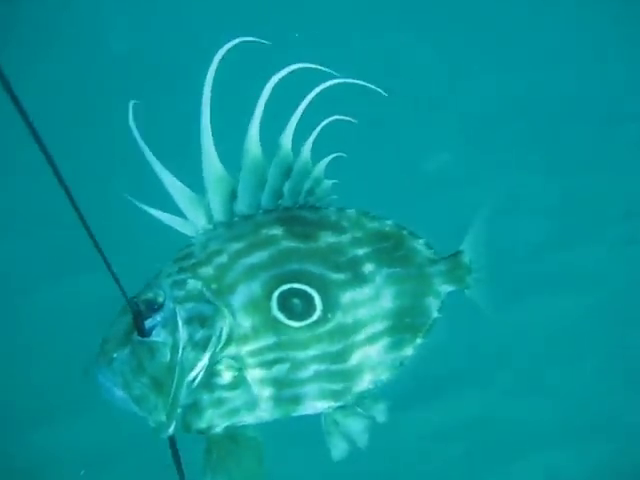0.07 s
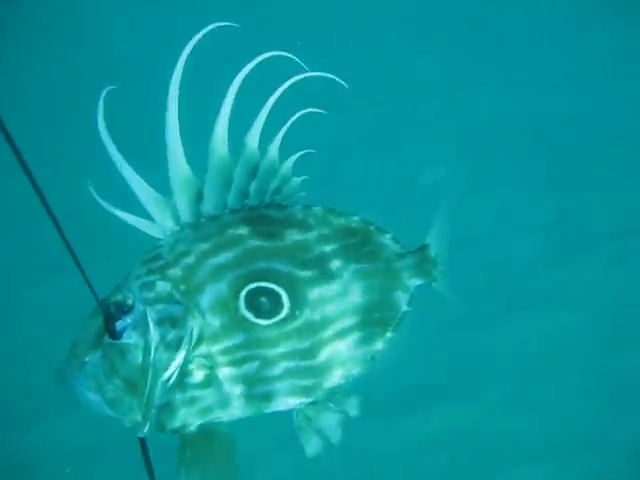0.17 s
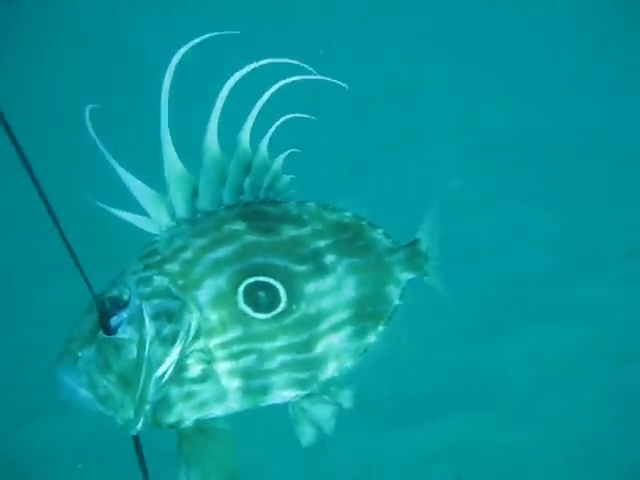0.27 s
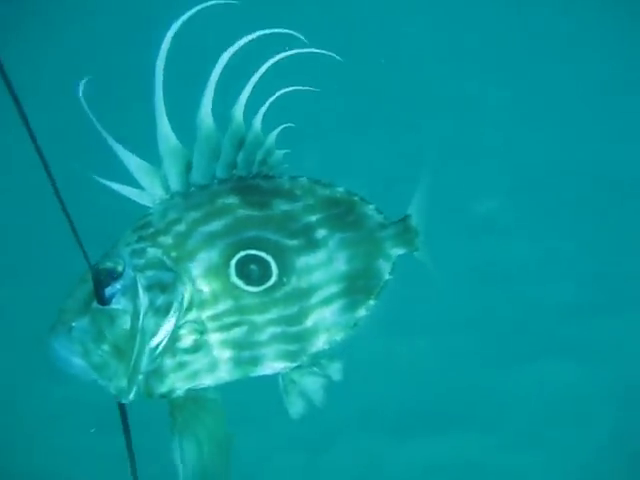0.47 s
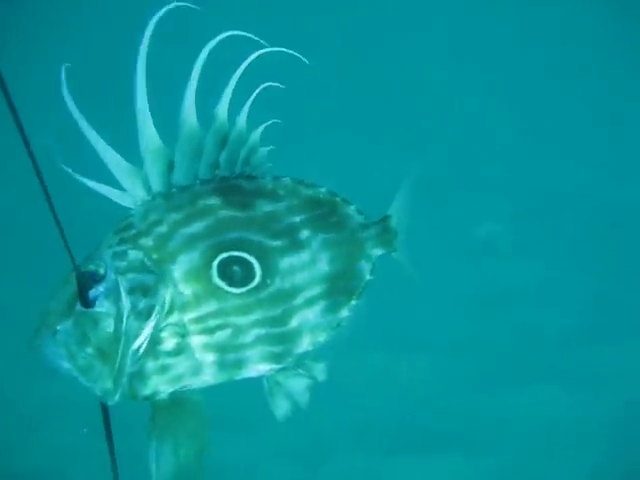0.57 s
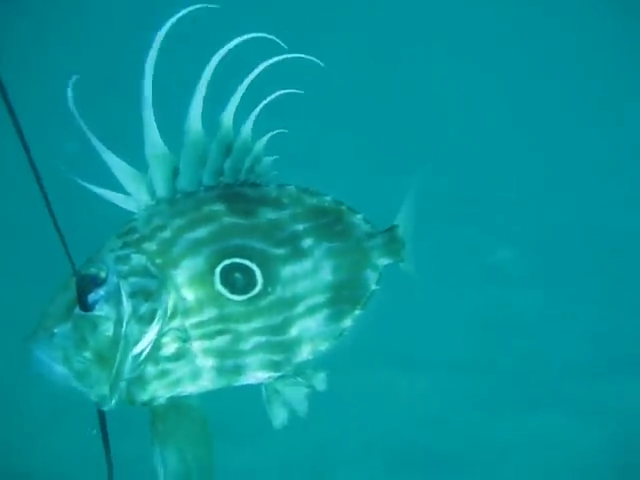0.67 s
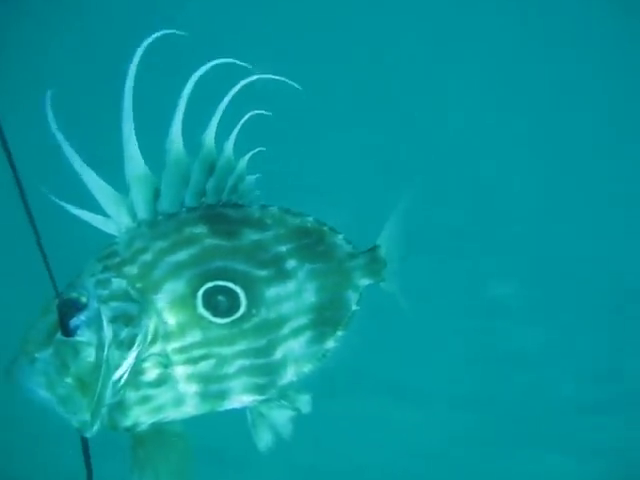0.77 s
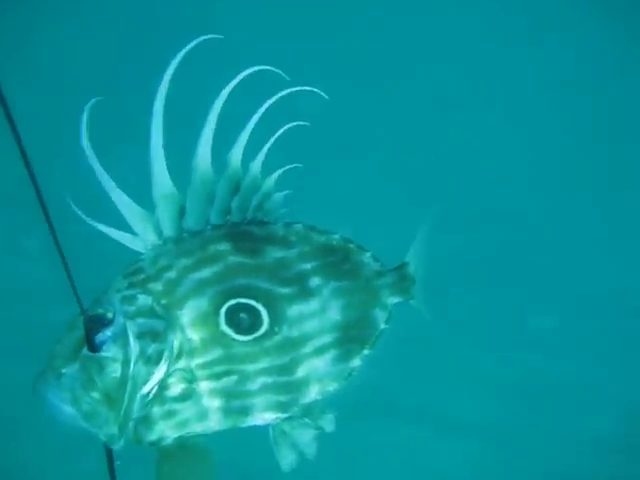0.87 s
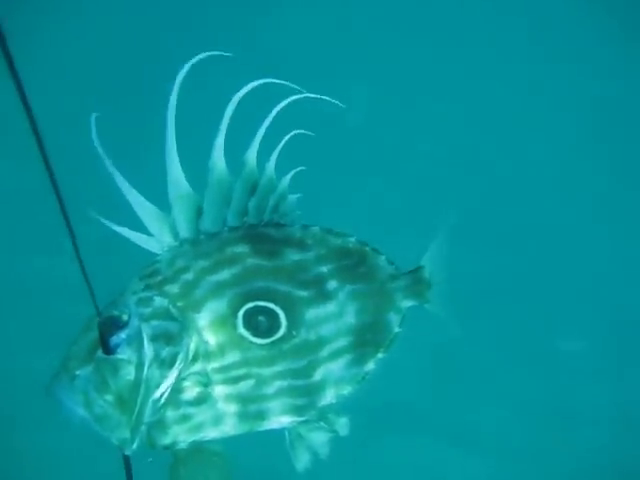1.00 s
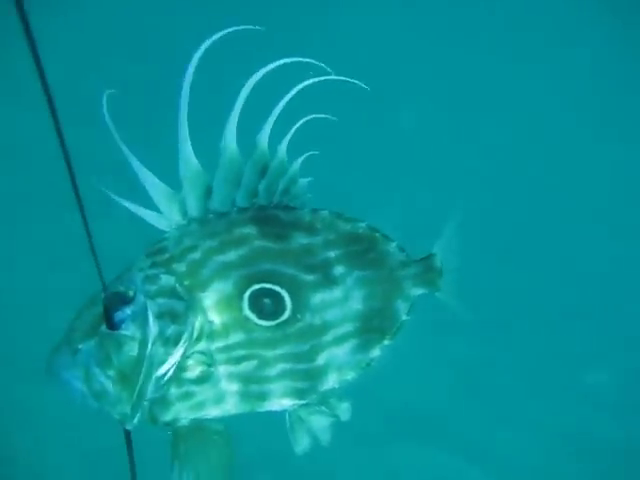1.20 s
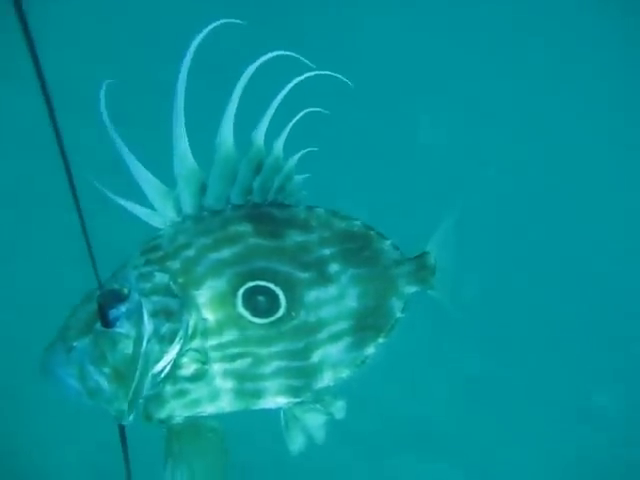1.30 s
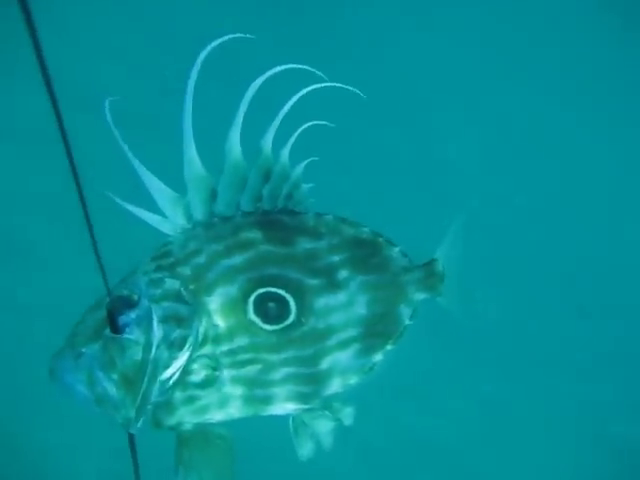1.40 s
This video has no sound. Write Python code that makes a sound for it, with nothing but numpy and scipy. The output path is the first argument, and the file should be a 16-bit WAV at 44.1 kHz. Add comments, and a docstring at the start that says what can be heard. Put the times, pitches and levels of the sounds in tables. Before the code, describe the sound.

A fish grunts once, close to an underwater microphone, from about 0.2 to 0.4 seconds: a low, rapid drumming that slows slightly. Quieter sea hiss and small, slightly ringing snaps, probably shrimps, continue near and far for the whole second and a half. Tiny bright pings come at 0.2 and 1.1 seconds. Soft knocks are scattered throughout, with faint low sloshing around 0.7 and 1.3 seconds.

```python
"""A fish grunts once near an underwater microphone: nine slowing muscle twitches drum on its swim
bladder, and the surface overhead sends back an echo. All around, the sea hisses and crackles with small
snaps, probably shrimps, near and far, among soft knocks, two bright pings and some low sloshing.
The microphone sits in a housing that rings near 2.5 kHz and in other narrow bands,
colouring the water noise and the snaps."""
import sys
import numpy as np
from scipy import signal
from scipy.fft import rfft, irfft
from scipy.io import wavfile

SR = 44100
rng = np.random.default_rng(int(sys.argv[2]) if len(sys.argv) > 2 else 0)


def file_out(sig):
    """Save sig as 16-bit WAV at sys.argv[1]."""
    # one column per channel
    cols = np.atleast_2d(sig).T
    # limit, then scale
    lim = np.clip(cols, -1, 1)
    pcm = np.round(lim * 32767).astype(np.int16)
    wavfile.write(sys.argv[1], SR, pcm)


N = 63945
TIME = np.arange(N) / SR

# hiss of the open water: (frequency [Hz], relative density [dB])
HISS_SPECTRUM = [(25, 3.5), (60, -1), (150, 1.5), (350, 1), (700, -4.5), (1100, -2.5), (1700, -2.5),
                 (2200, -5.5), (3500, -13), (5200, -13), (7000, -15), (9000, -14), (14000, -17.5),
                 (16000, -13)]
# low sloshing: (time [s], level [dB])
SLOSH_LEVELS = [(0, -76), (.65, -72), (.68, -56.5), (.8, -60.5), (.95, -69.5), (1.03, -66), (1.22, -75),
                (1.28, -48.5), (1.34, -59), (1.45, -62)]
# crackle in the distance: (frequency [Hz], relative density [dB])
CRACKLE_SPECTRUM = [(800, -9), (2000, -15), (2600, 14), (5000, -24), (9000, 7.5), (16000, -10.5)]
# a snap's bands, at the housing's ring, upper mids and treble: (low edge [Hz], high edge [Hz])
SNAP_BAND_EDGES = [(2380, 2740), (3000, 7500), (8300, 16000)]
# snaps near the microphone, levels relative:
# (time [s], ring band [dB], upper mids [dB], treble [dB], tail against its snap [dB], base decay [s])
NEAR_SNAPS = [(0.087, -50, -53, -64, -10, 0.0036), (0.109, -50, -52, -51, -25, 0.0024),
              (0.1236, -41.5, -50.5, -55, -35, 0.0025), (0.1592, -41.5, -40.5, -43, -24, 0.0012),
              (0.1995, -40.5, -45.5, -38.5, -20, 0.0015), (0.2134, -64, -39.5, -43, -16.5, 0.00064),
              (.2340, -42.5, -42.5, -46, -23.5, .0016), (0.2749, -43, -43, -56, -32, 0.00067),
              (0.2952, -52, -46.5, -59, -25, 0.0037), (0.354, -50, -68, -63, -17, 0.0032),
              (0.3739, -40, -44, -44.5, -29, 0.0014), (.4087, -45.5, -42.5, -52, -17.5, 0.0017),
              (.4527, -51.5, -45.5, -43.5, -20, 0.0023), (.5457, -54, -59, -39.5, -24, 0.0021),
              (.5587, -45.5, -61, -59, -27, 0.0027), (.5750, -44, -41.5, -38, -14, .001),
              (.6715, -45.5, -51.5, -46.5, -17.5, 0.0025), (0.716, -66, -54, -51, -29, 0.0027),
              (0.74, -67, -54, -42.5, -34, 0.0029), (0.744, -49, -49.5, -65, -22, 0.0021),
              (0.813, -61, -61, -54, -10, 0.0016), (.9338, -53, -52, -47, -21, 0.0015),
              (1.1362, -53, -49, -40.5, -17, 0.0023), (1.1419, -39, -47, -60, -19, 0.0019),
              (1.2052, -67, -52, -55, -15, 0.0023), (1.2444, -50, -57, -64, -14, 0.0038),
              (1.275, -46, -56, -65, -24, 0.0029), (1.3915, -47, -48, -71, -37, 0.0024),
              (1.4237, -49, -47.5, -44, -17.5, 0.0027)]
# resonances of the housing: (frequency [Hz], width [Hz], boost [dB])
HOUSING_MODES = [(622, 96, 5), (810, 46, 6.5), (1700, 125, 3), (2550, 103, 5), (3633, 380, 9.5),
                 (4295, 340, 8), (5780, 165, 8), (6790, 180, 6.5), (11300, 290, 3.5), (13200, 400, 6)]
# soft knocks and plops: (time [s], level [dB], frequency [Hz], t60 [s])
SOFT_KNOCKS = [(0.2572, -36, 1180, 0.014), (.663, -45, 250, 0.0049), (0.8213, -38, 1210, 0.015),
               (.822, -46, 633, 0.028), (0.924, -29, 170, 0.005), (0.939, -39.5, 1780, 0.018),
               (1.025, -43.5, 575, 0.035), (1.064, -41, 1540, 0.01), (1.25, -37.5, 270, 0.014),
               (1.351, -43.5, 610, 0.037), (1.414, -40.5, 188, 0.018), (1.415, -36.5, 1200, 0.0077)]
# bright pings: (time [s], level [dB], centre frequency [Hz], length [s])
BRIGHT_PINGS = [(.1998, -36, 2510, 0.0068), (1.1407, -30.5, 2467, 0.0059)]
# the muscle stirring around the grunt: (time [s], level [dB], frequency [Hz], t60 [s])
MUSCLE_STIRS = [(.208, -34, 274, 0.028), (.361, -35.5, 155, 0.024)]
# pace of the drumming muscle, slowing as it tires: (time [s], rate [twitches/s])
TWITCH_RATES = [(.216, 80), (.229, 71), (.258, 63.5), (.274, 63), (.295, 56.5)]
# strength of the twitches: (time [s], level [dB])
TWITCH_LEVELS = [(.216, -7.5), (.229, -.8), (.26, 0.46), (.342, 0.1)]
# the swim bladder and the flesh around it: (frequency [Hz], relative level [dB], t60 [s])
BLADDER_MODES = [(394.6, -8.5, 0.021), (175, -9.5, 0.009)]


def from_db(db):
    """Decibels to gain."""
    return 10 ** (np.asarray(db) / 20)


def rms_one(x):
    """Scale to unit rms."""
    return x / np.sqrt(np.mean(x ** 2) + 1e-20)


def butter(x, hz, kind, order=2):
    """Causal Butterworth filter."""
    return signal.sosfilt(signal.butter(order, hz, kind, fs=SR, output="sos"), x + 1e-18)


def band_noise(edges_hz):
    """A band of noise at unit rms."""
    return rms_one(butter(rng.standard_normal(N), edges_hz, "band"))


def coloured(noise, spectrum):
    """Give a noise a smooth spectrum, at unit rms."""
    hz, db = np.transpose(spectrum)
    bin_hz = np.maximum(np.fft.rfftfreq(N, 1 / SR), 1)
    gain = from_db(np.interp(np.log(bin_hz), np.log(hz), db))
    return rms_one(irfft(rfft(noise) * gain, N))


def ring(start, hz, t60):
    """A damped sine from the given moment."""
    age = np.maximum(TIME - start, 0)
    return np.sin(2 * np.pi * hz * age) * np.exp(-np.log(1000) * age / t60)


def thuds(table):
    """Small, heavily damped pulses."""
    return -sum(from_db(db) * ring(start, hz, t60) for start, db, hz, t60 in table)


def open_water(hiss_db=-54.5, wash_db=-65, wash_rise_db_per_s=1):
    """All around the microphone: steady hiss, sloshing that comes and goes, a slowly growing wash."""
    hiss = from_db(hiss_db) * coloured(rng.standard_normal(N), HISS_SPECTRUM)
    slosh_db = np.interp(TIME, *np.transpose(SLOSH_LEVELS))
    slosh = from_db(slosh_db) * band_noise(edges_hz=(116.5, 218))
    wash = from_db(wash_db + wash_rise_db_per_s * TIME) * band_noise(edges_hz=(285, 986))
    return hiss + slosh + wash


def far_crackle(snaps_per_s=260, level_db=-65.5, spread_db=5, decay_s=0.0018):
    """Far off, countless snaps of random size merge into a crackle."""
    sizes = from_db(spread_db * np.minimum(rng.exponential(1, N), 4))
    clicks = sizes * (rng.random(N) < snaps_per_s / SR)
    envelope = signal.lfilter([1], [1, -np.exp(-1 / (decay_s * SR))], clicks + 1e-18)
    return from_db(level_db) * coloured(envelope * rng.standard_normal(N), CRACKLE_SPECTRUM)


def near_snaps(gain_db=1, tail_s=0.021, rise_share=0.37):
    """Close by, each snap arrives as a dense burst of a few milliseconds with a faint scattered tail."""
    out = np.zeros(N)
    carriers = [band_noise(edges) for edges in SNAP_BAND_EDGES]
    decay_shares = (1, 1, 0.5)  # the treble dies sooner
    for start, *levels, tail_db, decay_s in NEAR_SNAPS:
        age = np.clip(TIME - start, 0, 1)
        tail = from_db(tail_db) * np.exp(-age / tail_s)
        for carrier, db, share in zip(carriers, levels, decay_shares):
            fall_s = share * decay_s
            rise = 1 - np.exp(-age / (rise_share * fall_s))
            envelope = rise * (np.exp(-age / fall_s) + tail)
            burst = envelope * carrier
            energy_trim = np.sqrt(np.sum(envelope ** 2) / np.sum(burst ** 2))
            out += from_db(gain_db + db) * energy_trim * burst
    return out


def housing(sound):
    """The walls around the microphone resonate and boost narrow bands."""
    ringing = np.zeros(N)
    for hz, width_hz, boost_db in HOUSING_MODES:
        band = signal.lfilter(*signal.iirpeak(hz, hz / width_hz, fs=SR), sound)
        ringing += (from_db(boost_db) - 1) * band
    return sound + ringing


def pings(sag_hz_per_s=21000, overtone_ratio=1.71, overtone_db=-19):
    """Brief pings swell and die, falling in pitch, each with one weak overtone."""
    out = np.zeros(N)
    for start, db, hz, length_s in BRIGHT_PINGS:
        swell = np.sin(np.pi * np.clip((TIME - start) / length_s, 0, 1)) ** 2
        from_middle = TIME - start - length_s / 2
        phase = 2 * np.pi * (hz - sag_hz_per_s * from_middle / 2) * from_middle
        overtone = from_db(overtone_db) * np.sin(overtone_ratio * phase)
        out += from_db(db) * swell * (np.sin(phase) + overtone)
    return out


def surface_echo(direct, delay_s=0.00402, level_db=-10):
    """The surface overhead reflects the sound back to the microphone, inverted."""
    return -from_db(level_db) * np.interp(TIME - delay_s, TIME, direct)


def muscle_stirs(radiates_above_hz=160):
    """The fish's drumming muscle stirs faintly just before and after the grunt."""
    return butter(thuds(MUSCLE_STIRS), radiates_above_hz, "high")


def fish_grunt(start_s=0.21635, twitch_count=9, soft_above_hz=614, radiates_above_hz=160):
    """In the foreground, each soft twitch of the tiring muscle rings the swim bladder."""
    drumming = np.zeros(N)
    twitch_s = start_s
    for _ in range(twitch_count):
        effort_db = np.interp(twitch_s, *np.transpose(TWITCH_LEVELS))
        for sign, (hz, db, t60) in zip((-1, 1), BLADDER_MODES):  # bladder and flesh move in opposition
            drumming += sign * from_db(effort_db + db) * ring(twitch_s, hz, t60)
        twitch_s += 1 / np.interp(twitch_s, *np.transpose(TWITCH_RATES))
    softened = butter(drumming, soft_above_hz, "low", order=6)
    return butter(softened, radiates_above_hz, "high")


def scene():
    """One microphone under water: the sea behind, the fish in front."""
    sea = housing(open_water() + far_crackle() + near_snaps()) + thuds(SOFT_KNOCKS) + pings()
    grunt = fish_grunt()
    fish = muscle_stirs() + grunt + surface_echo(grunt)
    return (sea + fish)[None]


def record(dry, notch_hz=7920, notch_width_hz=1600, cutoff_hz=15750):
    """The treble has a deep notch and a steep cut at the top."""
    notched = signal.lfilter(*signal.iirnotch(notch_hz, notch_hz / notch_width_hz, fs=SR), dry)
    top_cut = signal.ellip(10, .1, 80, cutoff_hz, fs=SR, output="sos")
    return signal.sosfilt(top_cut, notched)


dry = scene()
out = record(dry)
file_out(out)
```